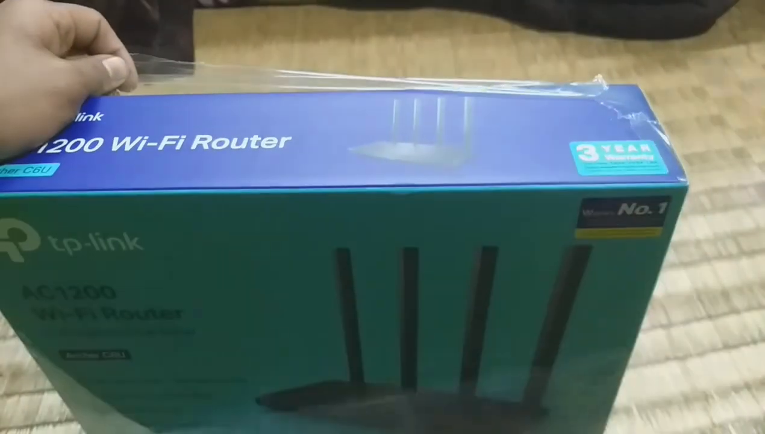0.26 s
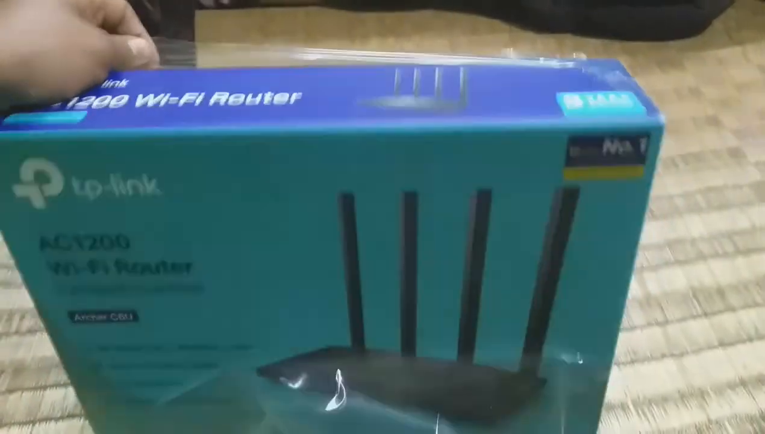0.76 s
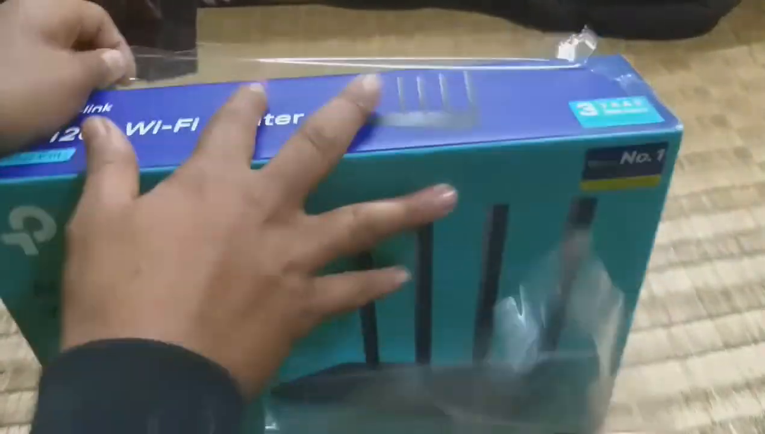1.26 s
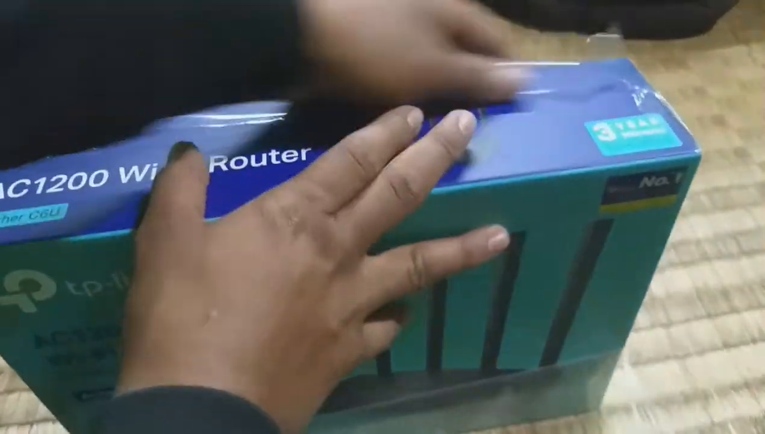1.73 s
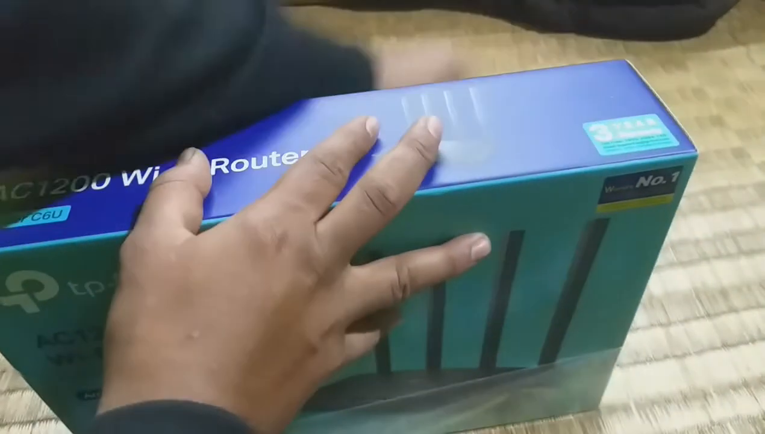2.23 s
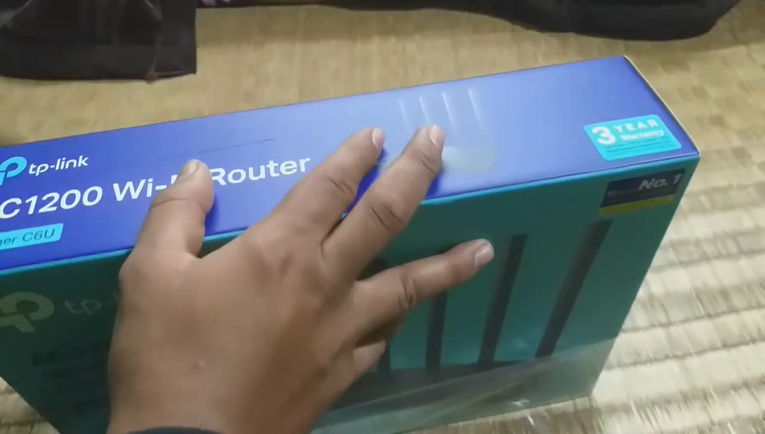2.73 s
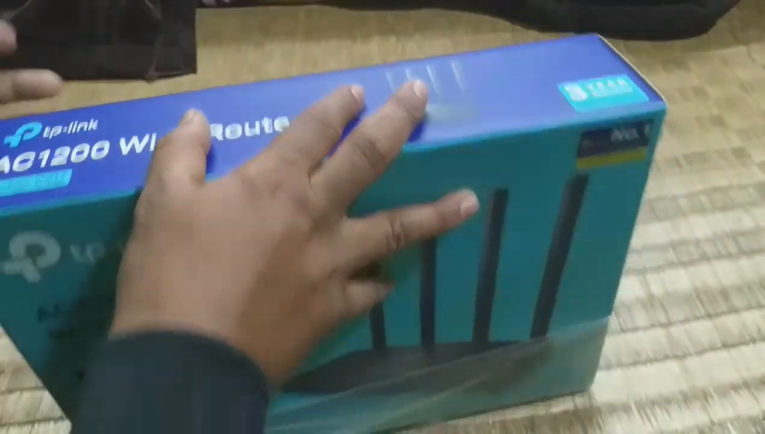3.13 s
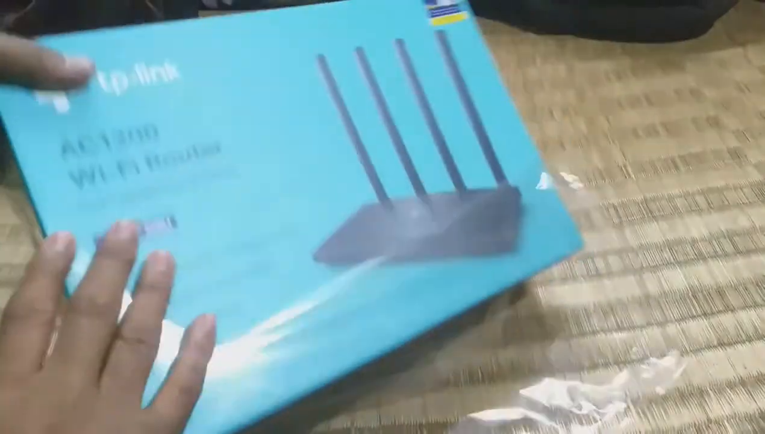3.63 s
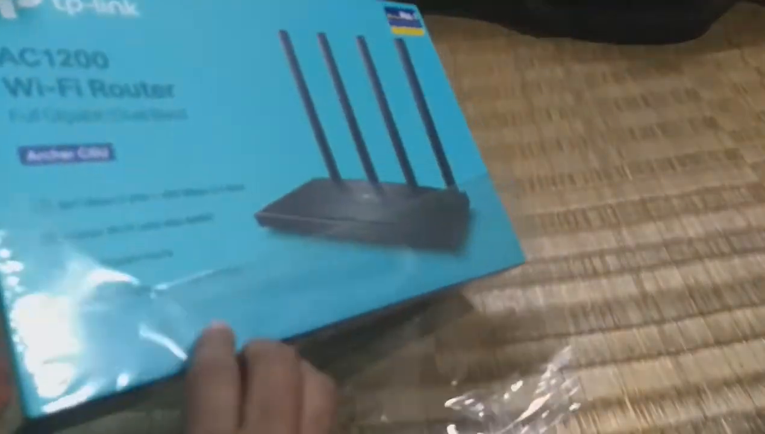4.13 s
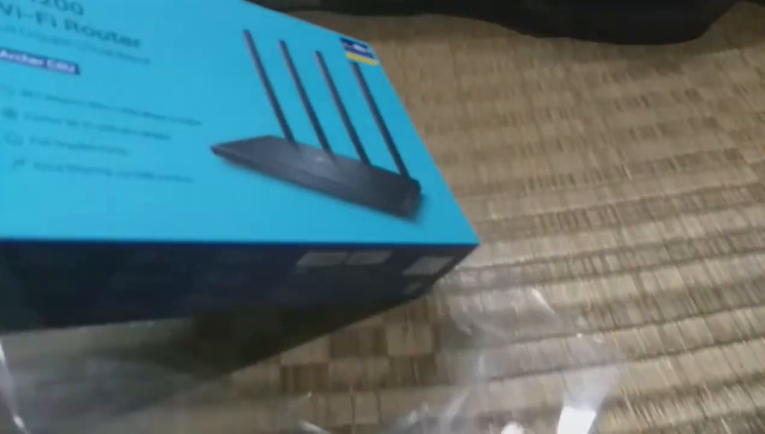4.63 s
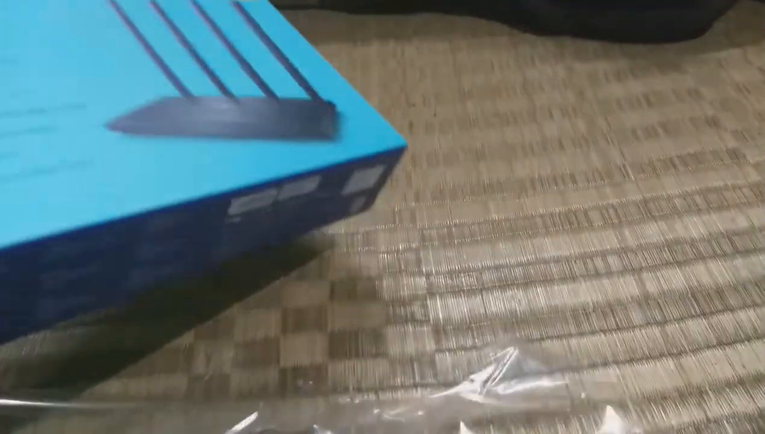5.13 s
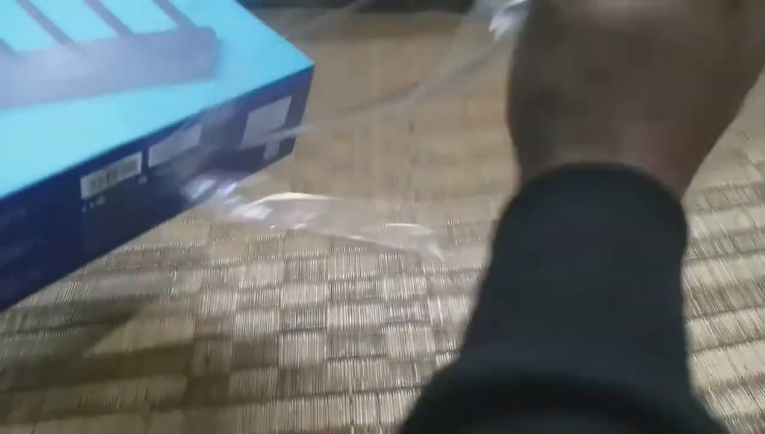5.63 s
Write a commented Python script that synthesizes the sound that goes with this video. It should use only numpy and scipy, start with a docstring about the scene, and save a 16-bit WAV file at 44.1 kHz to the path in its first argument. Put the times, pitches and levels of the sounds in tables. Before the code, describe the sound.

Close up in a small, quiet room, thin plastic film is stripped from a hollow cardboard box on a straw mat. Light crinkling and a faint low hum open, with a rapid ratcheting creak of sharp slips at 0.15-0.4 s. The box bumps softly near 0.5 s, then crisp snaps cluster at 0.6-1.05 s. Finger knocks and short rubs come at 1.2-1.45 s. After lighter crackle, crinkling swells at 2.1-2.7 s with a hard snap at 2.1 and a hollow knock near 2.6. A tiny squeak at 2.85 leads to a quieter moment, with a bump at 3.15. The strongest box knock lands about 3.6 s, followed by bright snaps to 3.8. A short creaky run at 4.3 s leads into a dense crackling burst until 4.5. Scattered snaps continue, with soft hollow film slaps at 5.15-5.5 s and final crinkles before 6 s.

```python
"""Thin plastic film is peeled off a cardboard box: creases snap singly over a dense crinkle of ringing clicks.
Stretched film and a taut seam creak in runs of slips, each slip setting short damped resonances ringing.
Fingers and tugs knock the hollow box, palms rub it, loose film slaps its open end: decaying panel and air modes.
Low filtered noise is the box shifting on a straw mat and a brief hum; sparse random echoes make a small room."""
import sys
import numpy as np
from scipy import signal
from scipy.fft import rfft, irfft
from scipy.io import wavfile

SR = 44100
rng = np.random.default_rng(int(sys.argv[2]) if len(sys.argv) > 2 else 0)


def int16_out(signal):
    """Quantize to a 16-bit WAV file."""
    q = np.round(np.clip(np.atleast_2d(signal).T, -1, 1) * 32767)
    wavfile.write(sys.argv[1], SR, q.astype(np.int16))


N = 258955  # length in samples

# Crease sizes, large to fine. Each row: lowest pitch in Hz, highest pitch in Hz, creases per second,
# size spread in dB (positive: a few stand out loud; negative: a few drop faint).
CREASE_SIZES = [(588, 1800, 1700, 2), (1950, 6350, 2500, 1.5), (6400, 11700, 2700, -3)]
# Film worked in overlapping long grips and short tugs. Each row: time at full strength in seconds, time to climb
# 20 dB in seconds (zero or less: at once), hold in seconds (sign ignored), middle creases in dB,
# large folds in dB relative to middle, fine creases in dB relative to middle.
FILM_TUGS = [(0.01, 2, 0.14, -47.5, -6, -8), (0.183, 0.16, 0.11, -51, 1, 1),
             (0.33, 0.005, 0.049, -50, 6.5, 0), (0.464, 0.1, 0.55, -45.5, -4, -8),
             (0.814, -0.08, 0.019, -43, -10, 2), (1.033, 0.05, 0.048, -42, 0, -6),
             (1.212, 0.04, 0.076, -54.5, 6, -4), (1.289, 0.06, 0.071, -42, 1.5, -3),
             (1.383, -0.06, 1.56, -46, -1.5, 1.5), (1.656, 0.16, 0.032, -42.5, 3, -18),
             (1.763, 0.23, 0.089, -49, -16, 12.5), (1.791, 0.02, 0.0075, -34, 4, -16),
             (1.991, -0.18, 0.019, -47.5, 0, 13.5), (2.133, 0.09, 0.044, -35, -1.5, 3.5),
             (2.176, 0.05, 0.19, -36.5, -3.5, -0.5), (2.433, 0.1, 0.16, -32, -0.5, -5),
             (2.602, 0, 0.12, -37.5, 4.5, -10), (2.737, -0.02, 0.056, -34.5, -1.5, -13),
             (2.974, 1.5, 0.052, -50, -1.5, -11), (3.155, 0.06, 0.28, -47, 1, -6.5),
             (3.4, -0.5, 0.049, -48.5, -3, 3), (3.578, 0.33, 0.11, -40, -1, -5),
             (3.602, 0.06, 0.035, -36, 11.5, -21), (3.703, -0.12, 0.12, -39, -4.5, 1),
             (3.879, -0.2, 0.28, -52, 3, -5), (4.008, -0.1, 0.025, -43, 0.5, -2),
             (4.053, 0.05, 0.031, -43.5, 2.5, -0.5), (4.119, -0.65, 0.56, -45.5, -7, -4.5),
             (4.711, -0.8, 0.45, -46.5, -5.5, -6), (4.304, -0.02, 0.045, -37.5, -4, -6),
             (4.466, 0.16, 0.012, -29.5, -3.5, -2.5), (4.514, -0.17, 0.095, -42.5, -6, 0),
             (4.833, 0.23, 0.038, -44, -12, -4), (4.98, 0, 0.022, -44.5, -7, -1),
             (5.188, -0.1, 0.12, -39.5, -6, -8), (5.365, 0.15, 0.13, -37, -5.5, -6.5),
             (5.655, 0.15, 0.039, -37, -6.5, -5), (5.71, 0.5, .14, -48.5, -3, -15),
             (5.862, 0, .02, -42, -9, -11)]
TUG_FALL_DB_PER_S = 300
# Single snaps of the film. Each row: time in seconds, level in dB, ring pitch in Hz,
# treble tick in dB relative to the level, dull flap in dB relative to the level.
FILM_SNAPS = [(0.1085, -22, 4770, -18, -27.5), (0.072, -28.5, 2500, -15, -17.5),
              (0.1325, -20.5, 3540, -11, -21), (0.466, -29, 3500, -16.5, -9),
              (0.5185, -22.5, 3320, -20.5, -5), (0.587, -22.5, 5100, -2, -8), (0.622, -26, 3700, 4, -25),
              (0.642, -25.5, 6000, -2, -20), (0.6545, -34, 4500, -6, -25), (0.6846, -24, 4000, -16, -4.5),
              (0.7005, -32, 7500, -12, -27), (0.7216, -14, 5370, -1.5, -18), (0.7512, -21, 4230, -2.5, -28),
              (0.7781, -19.5, 3450, -23.5, -9), (0.78, -14.5, 2580, -19, -26),
              (0.8043, -18, 2520, -14, -30), (0.827, -24, 3500, -15, -20), (0.832, -16, 7000, -22, -24),
              (0.8371, -18, 4600, -18, -11), (0.8436, -13.5, 7100, -27, -40), (0.8535, -21, 6000, -12, -27),
              (0.9382, -20, 3600, -9.5, -9), (0.988, -24.5, 5000, -14, -25), (1.0139, -33, 2260, -11, 16),
              (1.0402, -16, 5900, -21, -10), (1.256, -33.5, 2300, -17, 11), (1.2929, -22.5, 2270, 3.5, -22),
              (1.3154, -27.5, 3310, 8, -19), (1.3536, -30, 2760, -17, 1), (1.433, -30, 2280, -5.5, 7.5),
              (1.6834, -22, 4030, -14, -28), (1.79, -24.5, 2770, -16.5, 11), (1.813, -17, 12500, -3, -30),
              (1.193, -38.5, 2500, -22, 6.5), (1.9127, -26, 12310, -8, -34), (1.9798, -17, 9800, -15, -32),
              (2.1208, -10, 3940, 4, -2.5), (2.2104, -16, 6970, -15.5, -23), (2.5458, -25, 6310, -4, 11),
              (2.5882, -25, 3770, -19, 3), (2.6905, -21, 3200, -15, -6), (2.7467, -15.5, 1980, -28, -29),
              (2.895, -22.5, 8960, -17, -25), (3.141, -22, 6400, -8, -3), (3.2961, -34.5, 2420, -18.5, 13),
              (3.3427, -25, 5500, -17, -18), (3.3662, -22.5, 5100, -21, -10), (3.5075, -26, 3800, -17, -14),
              (3.3928, -29, 2070, -20, 11), (3.551, -22.5, 5570, -18, -10), (3.5612, -19, 2800, -25, 2.5),
              (3.5918, -17, 3220, -20, 10), (3.6032, -17, 3360, -21, 1), (3.611, -13, 2660, -29, 3.5),
              (3.623, -23, 2800, -20, -17), (3.6329, -20, 2800, -22, 5), (3.7416, -13, 6200, -16, -17),
              (3.745, -20, 5500, -12, -22), (3.7735, -14, 5450, -22, -9.5), (3.7852, -11.5, 4840, -6, -9),
              (3.808, -3.5, 9800, -26, -45), (3.9, -26.5, 6740, -20, -34.5), (3.9404, -29, 5430, -27, -21),
              (3.9585, -25.5, 1300, -23.5, -1), (4.064, -21, 3230, -18, -21), (4.1377, -18, 3440, -10, -7),
              (4.246, -23.5, 4460, -16, -26), (4.295, -13.5, 8100, -28, -21),
              (4.3758, -14.5, 5300, -17, -3), (4.4222, -8.5, 6100, -7, -31), (4.4285, -15, 5000, -17, -11),
              (4.4355, -12, 5190, -17, -10), (4.443, -12, 5100, -15, -13), (4.4582, -10, 6460, -20, -7),
              (4.4655, -10.5, 4170, -20, -13), (4.474, -12, 4650, -22, -13), (4.5391, -22.5, 3440, 7, -14),
              (4.712, -21.5, 2980, -18, -14), (4.727, -20.5, 7200, -13, -9), (4.789, -23, 2980, 2, -25),
              (4.8504, -19.5, 5260, -20, -18), (4.866, -12, 3770, -16, -13.5), (4.958, -25, 4500, -23, -6),
              (4.98, -27, 2500, -20, -4), (5.034, -30, 4000, -11, -18), (5.0518, -17.5, 6100, 0, -28),
              (5.1158, -20.5, 7200, -22, -33), (5.1455, -26.5, 4240, -4, -30),
              (5.239, -15.5, 4060, -26, -27), (5.2718, -18, 3500, -24, -24), (5.345, -17, 5260, -13, -14),
              (5.4987, -23, 3100, -19, -24), (5.6435, -19, 3360, -18, -16), (5.653, -13.5, 3470, -25, -12),
              (5.713, -22, 3220, -20, -2.5), (5.7617, -24, 2560, -23, -0.5)]
JERK = 3  # height of a snap's first jerk; its noise rattle starts at rms 1
# A taut seam lets go in slips. Each row: time in seconds, peak level in dB.
SEAM_SLIPS = [(0.162, -14), (0.172, -11.5), (0.1807, -17), (0.193, -13), (0.2044, -12), (0.2174, -13.5),
              (0.2322, -12.5), (0.2485, -11.5), (0.265, -17), (0.28, -17.5), (0.296, -25.5), (0.331, -13),
              (0.3434, -17), (0.3595, -13.5), (0.3733, -13)]
# Resonances of the stretched seam. Each row: pitch in Hz, width in Hz, level in dB.
SEAM_MODES = [(430, 80, -3), (1270, 400, 2), (2300, 450, 4), (3200, 450, 5), (4300, 700, 6), (6400, 500, 5),
              (8000, 900, 5)]
# Stretched film creaks in uneven slips. Each row: time in seconds, peak level in dB.
FILM_CREAKS = [(4.3033, -27), (4.315, -18), (4.3243, -21), (4.332, -24), (4.341, -15), (4.3455, -20),
               (4.3525, -20), (4.358, -16), (4.3655, -18), (4.37, -21)]
# Resonances of the creaking film. Each row: pitch in Hz, width in Hz, level in dB.
CREAK_MODES = [(1950, 300, 4), (900, 300, -7), (4500, 3000, 2)]
# Film squeaking over an edge. One row: start in seconds, length in seconds, pitch in Hz, width in Hz, level in dB.
EDGE_SQUEAK = (2.837, .033, 2600, 1100, -37.5)
# Panels and air of the box. Each row: pitch in Hz, level in dB, basic time to fall 60 dB in seconds.
BOX_MODES = [(165, 7, 0.077), (230, 3.5, 0.089), (300, 1.5, 0.087), (358, 0, 0.098), (419.4, 1, 0.055),
             (483, 2.5, 0.053), (558.4, -2, 0.059), (721, 4.5, 0.029), (805, 0.5, 0.054),
             (1113, 3.5, 0.024)]
# Knocks on the box. Each row: time in seconds, peak level in dB, pitch in Hz that the struck spot favours,
# ring length as a factor (at least 0.2 is used).
BOX_KNOCKS = [(0.53, -16.5, 157, 0.18), (0.563, -23, 323, 0.28), (1.01, -30.5, 485, 1.1),
              (1.194, -20.5, 230, 1.2), (1.256, -16, 374, 0.71), (1.284, -21, 182, 0.86),
              (1.308, -30, 450, 1.4), (1.434, -21.5, 240, 1.6), (1.787, -27.5, 485, 2.3),
              (1.863, -30.5, 240, 5), (2.014, -29.5, 382, 0.78), (2.069, -26, 370, 1.3),
              (2.121, -16, 358, 0.26), (2.319, -23, 490, 1.2), (2.417, -30, 456, 3.3),
              (2.547, -21, 466, 0.71), (2.586, -13, 610, 0.66), (2.916, -31, 358, 1.8),
              (3.065, -33, 395, 0.59), (3.144, -27.5, 500, 2), (3.156, -16.5, 320, 0.84),
              (3.263, -27.5, 476, 1.1), (3.293, -30, 170, 2.8), (3.389, -22, 470, 1.1),
              (3.419, -22.5, 195, 0.18), (3.489, -23.5, 355, 1), (3.561, -23, 810, 1.3),
              (3.592, -8.5, 660, 0.57), (3.595, -9.5, 610, 0.47), (3.608, -16, 370, 0.63),
              (3.635, -14, 400, 0.21), (3.957, -21, 345, 0.91), (4.016, -31.5, 350, 0.61),
              (4.056, -30, 840, 1.3), (4.075, -28.5, 760, 1.6), (4.293, -29.5, 384, 1),
              (4.346, -25.5, 445, 1.5), (4.96, -32, 258, 0.23), (5.861, -25.5, 520, 0.9)]
# Palms and film drag over the box. Each row: time at full strength in seconds, hold in seconds, level in dB,
# pitch in Hz that the rubbed spot favours.
BOX_RUBS = [(0.005, 0.54, -49.5, 300), (0.452, 0.052, -43, 230), (0.522, 0.035, -36, 260),
            (0.68, 0.35, -50, 382), (1.01, 0.029, -46, 430), (1.204, 0.03, -31.5, 203),
            (1.314, 0.021, -32.5, 314), (1.437, 0.012, -32.5, 240), (1.56, 0.23, -45, 326),
            (1.723, 0.05, -42, 430), (1.86, 0.062, -39.5, 231), (2.051, 0.061, -38.5, 300),
            (2.126, 0.058, -30.5, 350), (2.24, 0.11, -32.5, 350), (2.417, .16, -31.5, 326),
            (2.608, 0.14, -35.5, 358), (2.807, 0.24, -45, 280), (3.146, 0.012, -31.5, 258),
            (3.383, 0.018, -33.5, 327), (3.52, 0.088, -38, 324), (3.604, 0.097, -31.5, 383),
            (3.721, 0.043, -32, 340), (4.005, 0.12, -41.5, 392), (4.14, 0.17, -47.5, 325),
            (4.326, 0.16, -36.5, 360), (4.555, 0.26, -50, 290), (4.962, 0.0063, -44.5, 292),
            (5.157, 0.36, -45.5, 335), (5.628, 0.029, -42.5, 299), (5.7, 0.046, -47.5, 353)]
RUB_RISE_S, RUB_FALL_DB_PER_S = 0.01, 143  # the rise is the time to climb 20 dB
# Loose film slaps the open end of the lifted box. Each row: time in seconds, peak level in dB.
FILM_SLAPS = [(5.147, -32), (5.191, -27.5), (5.255, -27), (5.293, -26), (5.331, -27), (5.37, -27.5),
              (5.426, -28.5), (5.495, -27.5)]
# Air pocket of the open end. Each row: pitch in Hz, width in Hz, level in dB.
AIR_POCKET_MODES = [(307.5, 21, -7), (527, 18, 1), (578, 22, -7)]
# The box lands on the mat. Each row: time at full strength in seconds, level in dB.
MAT_THUMPS = [(0.47, -41.5), (3.16, -55)]
THUMP_RISE_S, THUMP_HOLD_S, THUMP_FALL_DB_PER_S = 0.035, 0.16, 94  # the rise is the time to climb 20 dB
THRUM_DB = -66  # low thrum that never stops
# A low hum that dies away as the box lands. One row: end in seconds, pitch in Hz, width in Hz, level in dB.
BOX_HUM = (0.43, 165, 36, -44)
# Echo decay of the room. Each row: frequency in Hz, time to fall 60 dB in seconds.
ROOM_DECAY = [(150, 0.21), (600, 0.13), (2500, 0.15), (8000, 0.15), (16000, 0.023)]
# Colour of the still air. Each row: frequency in Hz, relative level in dB per Hz.
AIR_COLOUR = [(40, -15), (100, 0), (1000, -6), (2500, -14), (8000, -20), (16000, -26)]
STILL_DB = -63
EDGE_HZ = 15950  # top of the microphone's band


def crinkle():
    """Each crease buckles and rings for a cycle or two at a pitch set by its size."""
    out, t = np.zeros(N), np.arange(300) / SR
    clumps = evened(band(rng.standard_normal(N), 12, 48))  # creases set each other off in bunches
    for size, (low_hz, high_hz, per_s, spread_db) in enumerate(CREASE_SIZES):
        train = clicks(per_s, spread_db)
        which = rng.integers(0, 20, N)  # each crease takes one of 20 pitches
        layer = np.zeros(N)
        for j, hz in enumerate(np.geomspace(low_hz, high_hz, 20)):
            grain = np.sin(2 * np.pi * hz * t) * np.exp(-t * hz / 0.51)
            layer += signal.oaconvolve(train * (which == j), grain / np.linalg.norm(grain))[:N]
        bunched = layer * gain_of(0.98 * clumps)
        out += worked(size) * evened(band(bunched, 1.16 * low_hz, 1.84 * high_hz, order=1))
    return out


def worked(size):
    """How hard creases of one size (0 large, 1 middle, 2 fine) are being worked, as a gain."""
    s, rise_s, hold_s, db, large_db, fine_db = np.transpose(FILM_TUGS)
    size_db = db + (large_db, 0, fine_db)[size]
    return np.sqrt(strokes(s, rise_s, hold_s, size_db, TUG_FALL_DB_PER_S))


def snaps():
    """A crease lets go in one jerk and a millisecond of rattle: a ringing patch, a treble tick, a duller flap."""
    out, t = np.zeros(N), np.arange(700) / SR
    noise = rng.standard_normal((len(FILM_SNAPS), 3, 700))
    jerk = JERK * (t == 0)
    for (s, db, hz, treble_db, body_db), (patch, fizz, flutter) in zip(FILM_SNAPS, noise):
        ring = band(jerk + patch * np.exp(-t / 0.0011), 0.82 * hz, 1.22 * hz, order=1)
        wide = band(jerk + patch * np.exp(-t / 0.0004), 0.4 * hz, 2 * hz, order=1)
        tick = band(jerk + fizz * np.exp(-t / 0.0006), 7500, 15000)
        flap = band(2 * jerk + flutter * np.exp(-t / 0.003), 650, 1200, order=1)
        snap = np.zeros(700)
        for part, share_db in ((ring, -3), (wide, -5), (tick, treble_db), (flap, body_db)):
            snap += gain_of(db + share_db) * part / abs(part).max()
        add(out, s + 0.00082, snap)
    return out


def pops():
    """Scattered small jerks with a brief rattle; they stand out most where the film is worked lightly."""
    out, t = np.zeros(N), np.arange(200) / SR
    train = clicks(220, 3.4)
    which = rng.integers(0, 10, N)  # each pop takes one of 10 pitches
    for j, hz in enumerate(np.geomspace(2000, 8000, 10)):
        rattle = rng.standard_normal(200) * np.exp(-t / 0.0007)
        pop = band(JERK * (t == 0) + rattle, 0.7 * hz, 1.5 * hz, order=1)
        out += signal.oaconvolve(train * (which == j), pop / np.linalg.norm(pop))[:N]
    return gain_of(-19.5) * worked(size=1) ** 0.65 * evened(out)


def slips():
    """Each slip is one sharp jerk that rings the same stretched seam, a little detuned; the box face echoes it."""
    out, t = np.zeros(N), np.arange(600) / SR
    hz, width, mode_db = np.array(SEAM_MODES).T[:, :, None]
    draws = rng.standard_normal((len(SEAM_SLIPS), 3, len(SEAM_MODES), 1))
    onset = np.minimum(t / 0.000087, 1)
    for (s, db), (detune, uneven, lag) in zip(SEAM_SLIPS, draws):
        wave = np.sin(2 * np.pi * hz * (1 + 0.05 * detune) * t + 0.45 * lag)
        ring = onset * np.exp(-np.pi * width * t) * wave
        jerk = (gain_of(mode_db + 1.5 * uneven) * ring).sum(0)
        jerk /= abs(jerk).max()
        add(out, s + 0.0008, gain_of(db) * jerk)
        add(out, s + 0.0022, gain_of(db - 7) * jerk)  # echo off the box face
    return band(out, 280, 16000)  # the film is too small to push deep bass


def creaks():
    """Stretched film sticks and slips; every slip rings the same broad resonances."""
    return rung(FILM_CREAKS, CREAK_MODES)


def chirp():
    """Film squeaks over an edge: a short rough burst of band-passed noise."""
    s, length_s, hz, width, db = EDGE_SQUEAK
    out, count = np.zeros(N), round(length_s * SR)
    squeak = band(rng.standard_normal(3000), hz - width / 2, hz + width / 2)[-count:]  # settled end of the filter
    add(out, s, gain_of(db) * evened(squeak) * signal.windows.tukey(count, 0.2))
    return out


def knocks():
    """Soft fingers and tugs: a few milliseconds of rise, then the panels ring out."""
    out, t = np.zeros(N), np.arange(8000) / SR
    # a blow starts the modes nearly together; phases in cycles
    phases = 0.35 * rng.random((len(BOX_KNOCKS), len(BOX_MODES)))
    for (s, db, hz, lasting), phase in zip(BOX_KNOCKS, phases):
        ring = box_ring(t, hz, max(lasting, 0.2), phase) * (1 - np.exp(-t / 0.0021))
        add(out, s, gain_of(db) * ring / abs(ring).max())
    return out


def box_ring(t, spot_hz, lasting, phase):
    """Decaying box modes, strongest near the pitch that the struck spot favours."""
    hz, db, t60 = np.array(BOX_MODES).T[:, :, None]
    near_db = -18 * np.log2(hz / spot_hz) ** 2
    envelope = gain_of(db + near_db - 60 * t / (t60 * lasting))
    return (envelope * np.sin(2 * np.pi * (hz * t + phase[:, None]))).sum(0)


def rubbing():
    """Film and palms drag over the card in uneven slips; the modes nearest the rubbed spot answer most."""
    drag = clicks(600, 3.6)
    t = np.arange(4000) / SR
    strength, spot_hz = rubbed()
    power, out = np.zeros(N), np.zeros(N)
    for hz, db, t60 in BOX_MODES:
        near = gain_of(db - 5.3 * np.log2(hz / spot_hz) ** 2)
        ring = gain_of(-60 * t / (0.8 * t60)) * np.sin(2 * np.pi * hz * t)
        signed_drag = drag * rng.choice([-1, 1], N)  # each mode gets its own signs
        out += near * evened(signal.oaconvolve(signed_drag, ring)[:N])
        power += near ** 2
    return strength * out / np.sqrt(power)


def rubbed():
    """Strength of the drag, and the favoured pitch averaged over the rubs by their power."""
    s, hold_s, db, hz = np.transpose(BOX_RUBS)
    power = strokes(s, RUB_RISE_S, hold_s, db, RUB_FALL_DB_PER_S)
    weighted_hz = strokes(s, RUB_RISE_S, hold_s, db, RUB_FALL_DB_PER_S, weight=hz)
    return np.sqrt(power), weighted_hz / power


def slaps():
    """Loose film slaps the open end of the lifted box and sets its air pocket ringing."""
    return rung(FILM_SLAPS, AIR_POCKET_MODES)


def rumble():
    """The box shifts on the mat, which thrums low: swells of deep noise over a faint steady floor."""
    s, db = np.transpose(MAT_THUMPS)
    thumps = strokes(s, THUMP_RISE_S, THUMP_HOLD_S, db, THUMP_FALL_DB_PER_S)
    thrum = evened(band(rng.standard_normal(N), 57, 84, order=3))
    return np.sqrt(thumps + gain_of(THRUM_DB) ** 2) * thrum


def hum():
    """A steady, slightly fuzzy low hum from the held box: a narrow band of noise."""
    end_s, hz, width, db = BOX_HUM
    power = strokes(0, 1, end_s, db, THUMP_FALL_DB_PER_S)
    return np.sqrt(power) * evened(band(rng.standard_normal(N), hz - width / 2, hz + width / 2))


def room(x):
    """Sparse taps of random sign, each band dying at its own speed; three echo patterns trade places."""
    out, at = np.zeros(N), np.arange(120, SR // 2 - 20, 20)
    for k in range(3):
        taps = np.zeros(SR // 2)
        taps[at + rng.integers(0, 20, len(at))] = rng.choice([-1., 1.], len(at))
        hz, t, spectrum = signal.stft(taps, SR, nperseg=256)
        decay = gain_of(-60 * t / read(ROOM_DECAY, hz)[:, None])
        tail = signal.istft(spectrum * decay, SR, nperseg=256)[1]
        # shares swing at 3.5 Hz, a sixth of a cycle apart: their total power stays constant
        share = np.sqrt(2 / 3) * np.cos(np.pi * (7 * np.arange(N) / SR + k / 3))
        out += signal.oaconvolve(x * share, tail / np.linalg.norm(tail))[:N]
    return out


def still_air():
    """Faint steady hush of the room: noise shaped in frequency."""
    hz = np.fft.rfftfreq(N, 1 / SR)
    spectrum = rfft(rng.standard_normal(N)) * gain_of(read(AIR_COLOUR, hz))
    return gain_of(STILL_DB) * evened(irfft(spectrum, N))


def clicks(per_s, spread_db):
    """Random clicks of either sign, their sizes spread exponentially in dB up to four times spread_db."""
    when, size, sign = rng.random((N, 3)).T
    size_db = spread_db * np.minimum(-np.log(size + 1e-9), 4)
    return (when < per_s / SR) * np.sign(sign - 0.5) * gain_of(size_db)


def strokes(s, rise_s, hold_s, db, fall_db_per_s, weight=1):
    """Summed power of strokes that climb 20 dB in rise_s, hold, and die away; one value per sample."""
    t = np.arange(0, N + 64, 64)[:, None] / SR  # worked out every 64 samples
    early = np.maximum(s - t, 0)
    late = np.maximum(t - s - np.abs(hold_s), 0)
    level_db = db - 20 * early / np.maximum(rise_s, 1 / SR) - fall_db_per_s * late
    power = gain_of(np.maximum(level_db, -200)) ** 2
    return np.interp(np.arange(N) / SR, t[:, 0], (power * weight).sum(1))


def rung(events, modes):
    """Each event sets the same modes ringing, a little detuned and uneven."""
    out, t = np.zeros(N), np.arange(5000) / SR
    hz, width, mode_db = np.array(modes).T[:, :, None]
    draws = rng.standard_normal((len(events), 2, len(modes), 1))
    for (s, db), (detune, uneven) in zip(events, draws):
        envelope = gain_of(mode_db + 2 * uneven) * np.exp(-np.pi * width * t)
        ring = (envelope * np.sin(2 * np.pi * hz * (1 + 0.02 * detune) * t)).sum(0)
        add(out, s, gain_of(db) * ring / abs(ring).max())
    return out


def gain_of(db):
    """Decibels to amplitude."""
    return 10 ** (np.asarray(db) / 20)


def evened(x):
    """Scales to rms 1."""
    return x / np.sqrt(np.mean(x ** 2) + 1e-20)


def read(points, hz):
    """Reads a curve on a log-frequency axis."""
    f, value = np.transpose(points)
    return np.interp(np.log(hz + 1), np.log(f + 1), value)


def band(x, low_hz, high_hz, order=2):
    """Band-pass."""
    edges = np.clip([low_hz, high_hz], 20, SR / 2 - 500)
    return signal.sosfilt(signal.butter(order, edges, "bandpass", fs=SR, output="sos"), x)


def add(mix, s, sound):
    """Lays a sound into the mix at time s."""
    part = mix[max(round(s * SR), 0):][:len(sound)]
    part += sound[:len(part)]


def scene():
    """Film and box, their echo, and the low and quiet background."""
    film = crinkle() + snaps() + pops() + slips() + creaks() + chirp()
    box = knocks() + rubbing() + slaps()
    box = band(box, 125, 9000, order=3)  # a small box radiates little deep bass
    echo = room(gain_of(-11) * (film + box))
    return (film + box + echo + rumble() + hum() + still_air())[None]


def record(dry):
    """The small microphone drops the deepest bass, then everything above its band."""
    thin = signal.sosfilt(signal.butter(6, 58, "highpass", fs=SR, output="sos"), dry)
    lowpass = signal.firwin(511, EDGE_HZ, window=("kaiser", 9), fs=SR)
    return signal.oaconvolve(thin, lowpass[None], "same")


dry = scene()
out = record(dry)
int16_out(out)
```